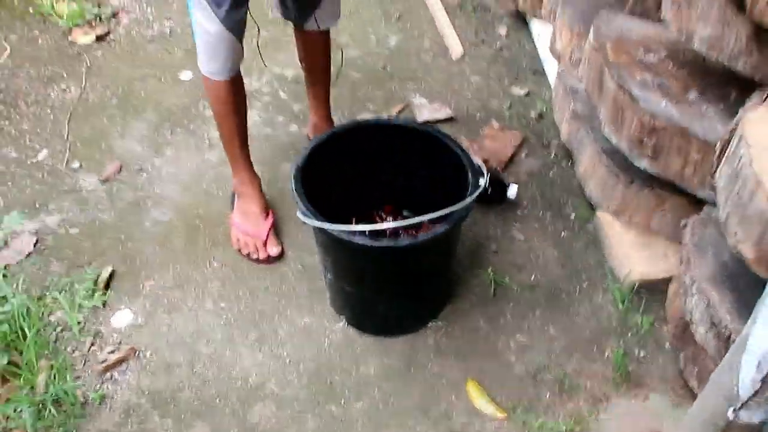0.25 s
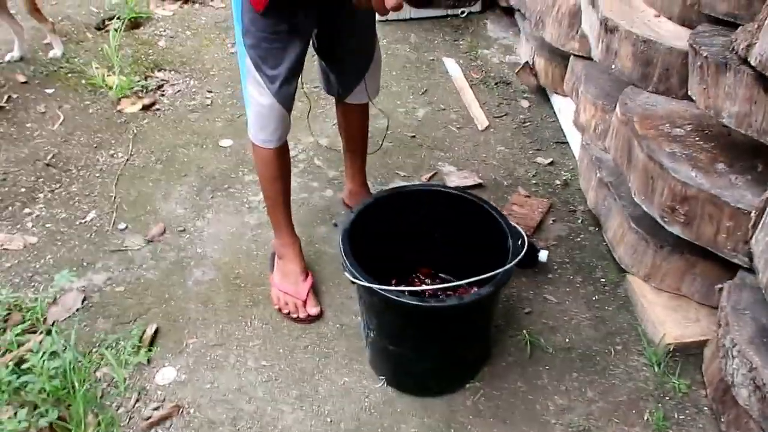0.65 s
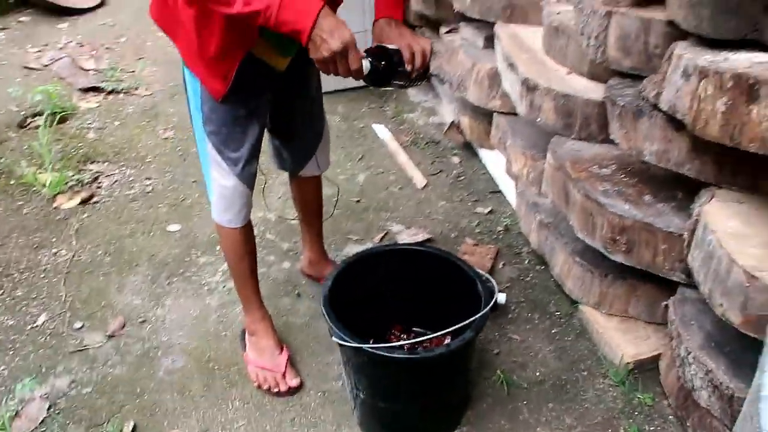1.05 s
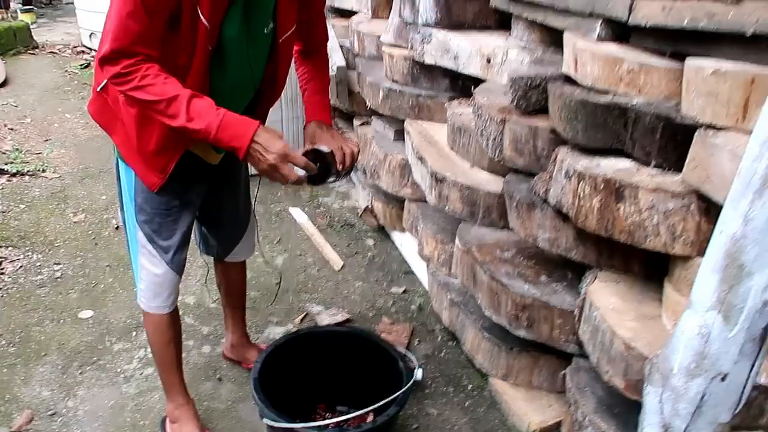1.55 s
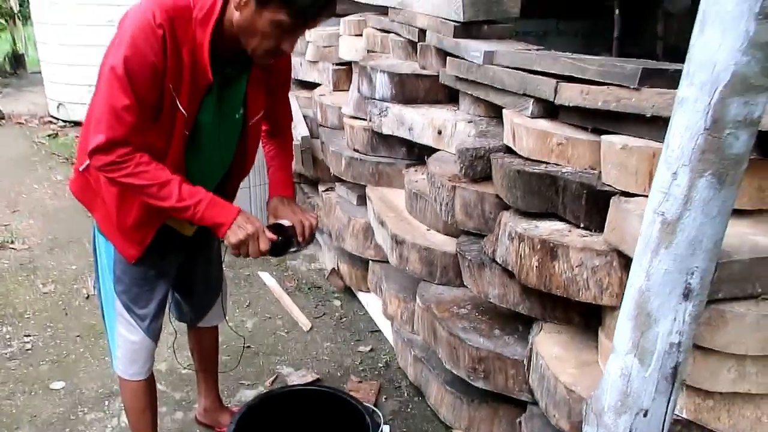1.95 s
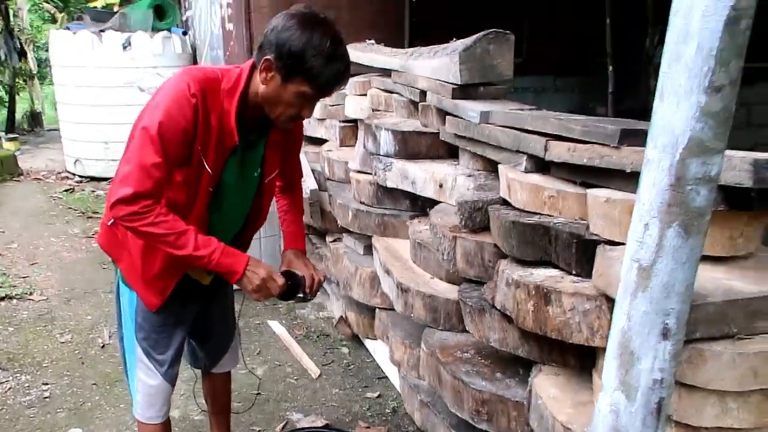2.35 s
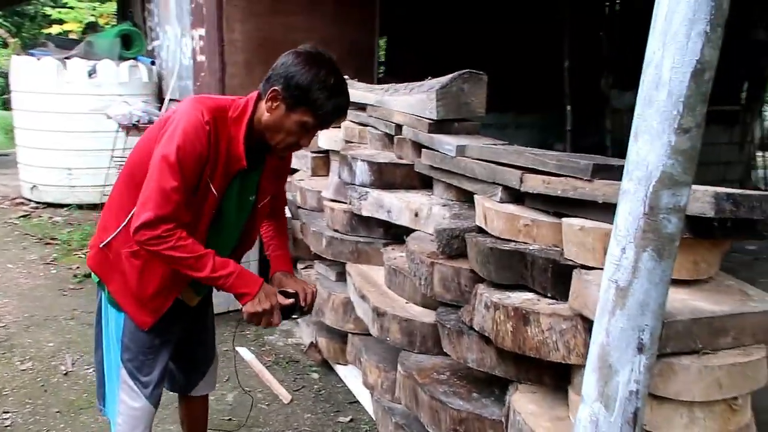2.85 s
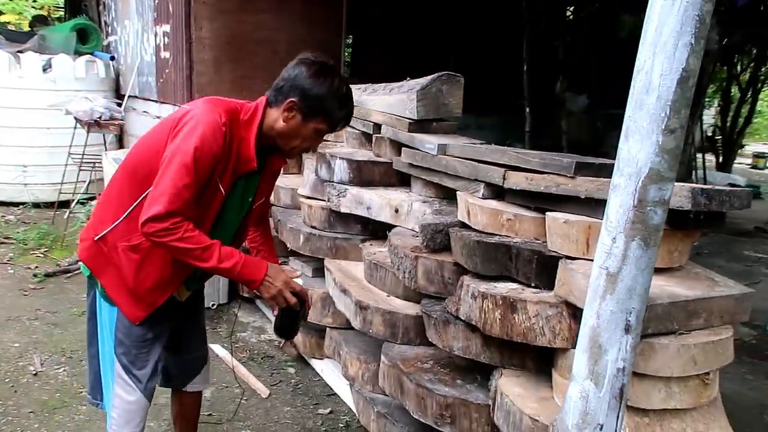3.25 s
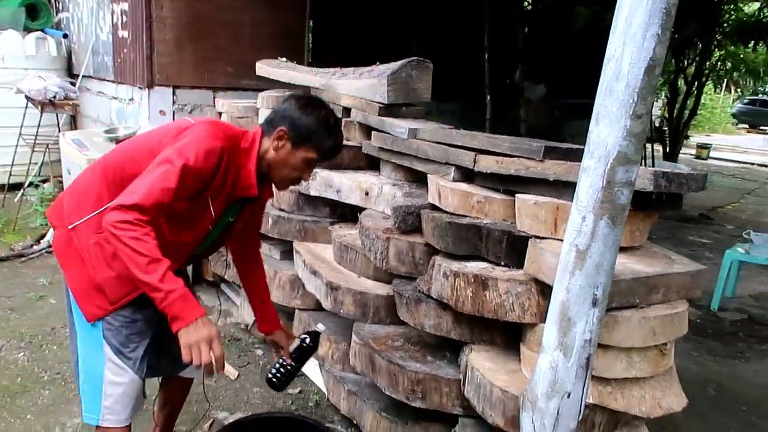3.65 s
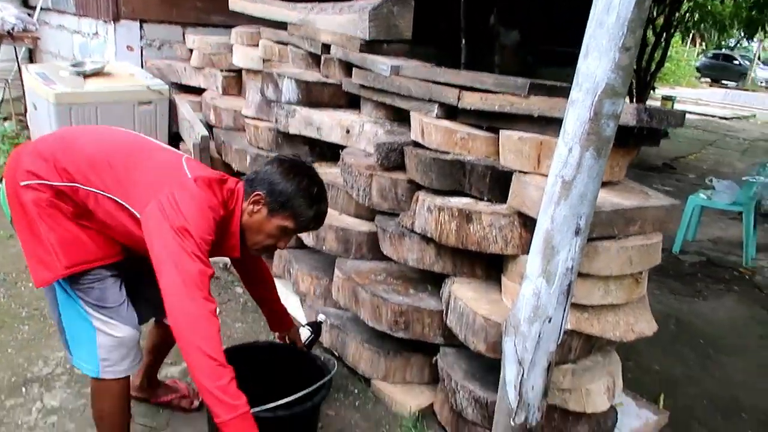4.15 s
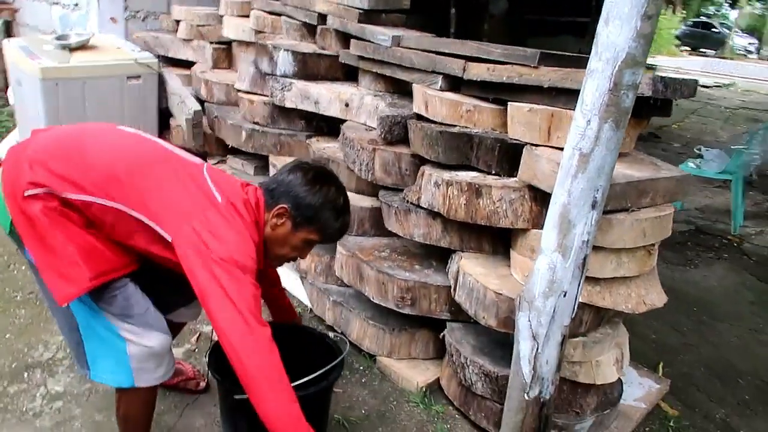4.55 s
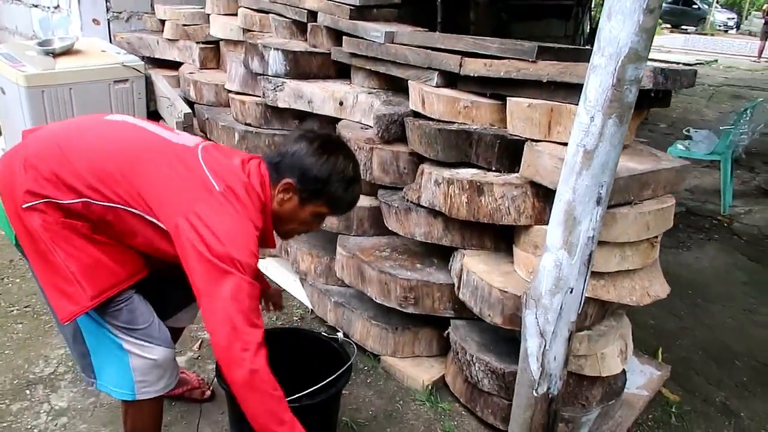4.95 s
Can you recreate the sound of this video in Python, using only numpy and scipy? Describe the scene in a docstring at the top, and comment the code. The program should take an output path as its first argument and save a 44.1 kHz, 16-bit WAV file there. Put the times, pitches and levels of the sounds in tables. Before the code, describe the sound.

A plastic bottle knocks and clicks over a bucket outdoors, its cap squeaking faintly as it is twisted, while a bird chirps briefly.

```python
"""Plastic bottle over a bucket

Close to the microphone, in a yard, a plastic bottle knocks and clicks over a plastic bucket. Hands rub
it, sleeves rustle, and the cap sticks and slips in squeaks as it is twisted off. A dull thump comes
before the last knocks, a faint one after. Farther off a bird chirps four times; a timber stack scatters
the sounds. The camera's noise suppressor holds the outdoor air down and lets it swell around each one."""
import sys
import numpy as np
from scipy import signal
from scipy.fft import rfft, irfft, next_fast_len
from scipy.io import wavfile
from scipy.ndimage import uniform_filter1d

SR = 44100
rng = np.random.default_rng(int(sys.argv[2]) if len(sys.argv) > 2 else 0)


def materialize(psi):
    """Save the field psi as 16-bit PCM at rate SR to the path in sys.argv[1].

    A 1-D psi becomes a single channel; in a 2-D psi each row is a channel.
    """
    bounded = np.clip(np.atleast_2d(psi).T, -1, 1)
    quanta = np.round(bounded * 32767).astype(np.int16)
    wavfile.write(sys.argv[1], SR, quanta)


N = 229011

# Strength of the breeze at the microphone. Each row: time in seconds, level in dB.
BREEZE_LEVELS = [(0, -50.5), (.35, -51.5), (.8, -55), (1.2, -56.5), (1.48, -53.5), (1.72, -55), (2.4, -52),
                 (3, -53.5), (4.698, -57), (5.19, -54)]
# Noise colours. Each row: frequency in Hz, relative spectral density in dB.
RUMBLE_SPECTRUM = [(15, -57), (25, -30.5), (65, -8), (85, -1), (193, -2.5), (254, -5), (379, -8),
                   (500, -14.5), (650, -39.5), (1100, -120)]
BREEZE_SPECTRUM = [(200, -31), (400, 1.5), (800, 0.5), (1500, -4), (2500, -11), (4000, -30)]
HISS_SPECTRUM = [(1180, -32.5), (2000, -2), (2830, 0), (4730, -3), (6700, -7.5), (8900, -7.5),
                 (9900, -14.5), (16000, -21.5)]
RASP_SPECTRUM = [(100, -13), (300, 4.5), (900, 1.5), (1600, 6), (2500, 7), (3500, 6.5), (4600, -4.5),
                 (7000, -10.5), (9000, -13), (11000, -22), (16000, -28)]
CLOTH_SPECTRUM = [(40, -13), (90, 4), (160, 8), (300, -2.5), (600, -7), (1200, -29), (3000, -56)]
FRICTION_SPECTRUM = [(80, -15.5), (250, -6.5), (700, -2.5), (1600, -4), (2800, -5), (4300, -3.5),
                     (6000, -10), (8500, -13.5), (11000, -19.5), (13000, -23.5), (16000, -27.5)]
# Near scatter and far echo. Each row: frequency in Hz, seconds to fall 60 dB (t60).
TIMBER_DECAY = [(200, 0.093), (1000, .11), (2500, 0.12), (4500, 0.049), (15000, 0.059)]
YARD_DECAY = [(200, 0.56), (1000, 0.28), (3000, 0.25), (12000, 0.14)]
# The bird's calls. Each row: start in seconds, length in seconds, level in dB, pitch ratio.
CHIRPS = [(2.473, 0.041, -36, 0.92), (2.742, 0.045, -31, 1.01), (2.931, .062, -28, .99),
          (3.138, 0.061, -27.5, 1)]
# The arch of one chirp. Each row: share of its length, base pitch in Hz, relative level in dB.
CHIRP_ARCH = [(0, 2040, -3), (.15, 2870, -10), (.28, 3330, -7.5), (.48, 3223, -10), (0.639, 2690, 0),
              (.82, 2530, -8), (1, 2510, -4.5)]
# The band the bird's throat passes. Each row: frequency in Hz, gain in dB.
THROAT_GAIN = [(800, -41), (1600, -1), (2100, 3), (3450, -2.5), (3800, -25.5), (5000, -35)]
# Swishes of the jacket. Each row: start in seconds, length in seconds, level in dB.
SWISHES = [(2.052, 0.23, -48), (2.286, 0.5, -52), (2.735, 0.33, -58), (3.161, 0.064, -51)]
# Hands and soles rubbing. Each row: start and length in seconds, level in dB, tilt in dB per octave.
RUBS = [(0.105, 0.038, -56, 4), (0.141, 0.023, -43.5, 0), (0.557, 0.05, -49.5, 0.5),
        (0.614, 0.18, -56, 2.5), (0.906, 0.024, -47, 5.5), (0.977, 0.058, -51.5, 4.5),
        (1.77, 0.053, -51, -2.5), (1.936, 0.097, -42.5, 8), (2.06, 0.077, -50.5, 3.5),
        (3.316, 0.17, -55, -1), (3.673, 0.031, -45.5, -4.5), (3.905, 0.12, -52.5, 1.5),
        (4.093, 0.066, -44.5, 7), (4.336, 0.063, -46, -0.5), (4.481, 0.031, -47.5, 3.5),
        (5.154, 0.049, -55.5, 0.5)]
# Soft thumps. Each row: start in seconds, level in dB, pitch in Hz.
THUMPS = [(3.694, -19.5, 205), (5.044, -40, 410)]
# What a thump rings with. Each row: ratio to its pitch, level in dB, t60 in seconds.
THUMP_MODES = [(1, -2, 0.045), (1.5, -5, 0.05), (2.4, -16.5, .03)]
# The cap's squeaks. Each row: start and length in seconds, pitch in Hz, level in dB, roughness.
SQUEAKS = [(0.9008, 0.017, 3340, -39.5, 0.97), (1.01, 0.019, 5480, -48, 0.54),
           (1.85, 0.052, 1524, -49, 0.68), (1.927, 0.039, 3940, -44, 0.46),
           (1.928, 0.036, 7850, -47.5, 0.5), (4.103, 0.0044, 3790, -38.5, 0.9),
           (4.33, 0.012, 1610, -47.5, 0.9), (4.355, 0.015, 4250, -43.5, 1.2),
           (4.416, 0.03, 2024, -42.5, 0.37), (4.471, 0.03, 2020, -49.5, 0.2)]
# Knocks and clicks of the plastic. Each row: time in seconds, strength in dB, bass weight in dB,
# hardness in dB per octave, clack pitch in Hz, wall buzz in dB.
CONTACTS = [(0.173, -21.5, -14, 14, 3460, -24), (0.174, 24.5, 4, -2, 3716, 2.5),
            (0.2144, 10.5, -27, 3.5, 4100, -13), (0.218, 5, 3.5, 1, 3100, -1),
            (0.233, -19, 22, 8, 3800, -13), (0.2908, -30, -9, 10.5, 9500, -20),
            (0.3618, 2, 4, -1.5, 3400, 10), (0.5673, -2, -7, -4, 3300, 1),
            (0.9091, -24.5, -6, 10.5, 3500, 1.5), (1.0143, -6.5, 4.5, -5, 4450, 7),
            (1.0244, -10.5, 1, 4, 3060, -6.5), (1.8121, -1, 13, -1.1, 2560, 16),
            (1.8271, 2, 5.5, -4.5, 4000, 8), (2.0513, 1.5, 9, .3, 2620, 8.5),
            (2.0923, 2.5, 4, -0.1, 4300, 2), (2.2244, 2.5, -3, -0.76, 3480, -3),
            (2.386, -5, 1, -3.5, 2840, 1), (2.906, 7, -6, -3.5, 2940, -7),
            (3.384, -48.5, -21, 12.5, 7800, -9), (3.5332, -13.5, 8.5, 2.5, 4200, 4),
            (3.841, 8.5, 4.5, -1, 4100, -3.5), (4.1049, -14.5, -2, 4.5, 4370, -4.5),
            (4.1694, 23, 0.5, -2.5, 2600, -9.5), (4.1719, 9.5, 5.5, -4.5, 2304, -8),
            (4.1874, 4.5, -4.5, 3, 2750, -5), (4.2415, -4, 6.5, -3.3, 2480, -4),
            (4.377, -2.5, -8, -3.2, 4100, -6), (4.3977, 1, -6, -8, 3500, -16)]
# The push that all contacts share. Each row: frequency in Hz, level in dB.
PUSH_SPECTRUM = [(40, -29), (130, -25.5), (220, -3.5), (420, 4), (1000, 0.24), (1750, -6), (3400, -8),
                 (5300, -13.5), (7000, -19.5), (9000, -21), (11000, -26), (16000, -32.5)]
# Ringing of the plastic shell. Each row: frequency in Hz, level in dB, t60 in seconds.
SHELL_MODES = [(387.5, 1.5, 0.012), (735, -2.5, 0.025), (843, -5, .07), (1305, 3, 0.032),
               (1451, -0.5, 0.088), (1680, -4, 0.057), (2150, 4, .022), (2360, -7.5, 0.1),
               (2770, -1, 0.026), (3550, -2, 0.059), (5330, -1.5, .035)]

WEIGHT_HZ, HARD_FROM_HZ, HARD_TO_HZ = 420, 1000, 13000  # full bass weight below; span of the tilt
CLACK_DB, CLACK_DB_PER_HARDNESS, CLACK_OCTAVES = 7, 0.45, 0.24  # a peak that grows with hardness
SECOND_VOICE_RATIO, SECOND_VOICE_DB = 0.92, -7  # the other side of the bird's syrinx sounds lower
BASS_CUT_DB, TREBLE_CUT_DB, SPLIT_HZ = 10.5, 14, 2800  # how far the suppressor lowers quiet air
KNEE_DB, CLOSE_PER_S, BLOCK = 5, 13.3, 1024  # rise that mostly opens it; closing speed; samples a block
CEILING, TOP_HZ = .93, 16100


def amp(db):
    return 10 ** (np.asarray(db) / 20)


def unit(x):
    return x / np.sqrt(np.mean(x ** 2) + 1e-20)


def along(points, hz):
    """Interpolate (Hz, value) points on a log frequency axis."""
    f, v = np.transpose(points)
    return np.interp(np.log(hz + 1), np.log(f + 1), v)


def clock(length):
    return np.arange(max(int(length * SR), 8)) / SR


def add(track, start, x):
    """Mix x into the track at start seconds."""
    i = int(np.clip(round(start * SR), 0, N - 1))
    track[i:i + len(x)] += x[:N - i]


def wobble(rate):
    """A smooth random curve, rate knots a second."""
    knots = rng.standard_normal(int(N * rate / SR) + 4)
    fine = signal.resample_poly(knots, up=8, down=1)
    return np.interp(np.arange(N) * rate / SR, np.arange(len(fine)) / 8, fine)


def filtered(x, gain):
    """x times a gain that depends on frequency."""
    m = next_fast_len(len(x) + 8192)
    return irfft(rfft(x, m) * gain(np.fft.rfftfreq(m, 1 / SR)), m)[:len(x)]


def band(x, low_hz, high_hz):
    """A causal band-pass."""
    sos = signal.butter(3, [low_hz, min(high_hz, .49 * SR)], "band", fs=SR, output="sos")
    return signal.sosfilt(sos, x)


def noise(spectrum):
    return unit(filtered(rng.standard_normal(N), lambda hz: amp(along(spectrum, hz))))


def push(spectrum, size):
    """The shortest causal pulse with this spectrum."""
    cepstrum = irfft(np.log(amp(along(spectrum, np.fft.rfftfreq(size, 1 / SR)))))
    cepstrum[1:size // 2] *= 2
    cepstrum[size // 2 + 1:] = 0
    return irfft(np.exp(rfft(cepstrum)))


def tail(decays, onset_s, size=12288):
    """A diffuse echo of energy 1; each frequency dies at its own speed."""
    hz, t, spectra = signal.stft(rng.standard_normal(size), SR, nperseg=256)
    decay = amp(-60 * t / along(decays, hz)[:, None])
    echo = signal.istft(spectra * decay, SR, nperseg=256)[1][:size]
    echo *= 1 - np.exp(-(np.arange(size) / SR / onset_s) ** 2)
    return echo / np.linalg.norm(echo)


def space(near_db, far_db):
    """Three paths to the microphone: direct, off the nearby timber, and round the yard."""
    paths = amp(near_db) * tail(TIMBER_DECAY, onset_s=0.0032)
    paths += amp(far_db) * tail(YARD_DECAY, onset_s=0.021)
    paths[0] += 1
    return paths


def air():
    """The bed of the yard: one breeze drives a low rumble and soft moving air, under a steady hiss."""
    breeze_db = np.interp(np.arange(N) / SR, *np.transpose(BREEZE_LEVELS))
    rumble = amp(breeze_db - 2.5 + 1.5 * wobble(10)) * noise(RUMBLE_SPECTRUM)
    breeze = amp(breeze_db + 0.58 * wobble(30)) * noise(BREEZE_SPECTRUM)
    return rumble + breeze + amp(-58.5) * noise(HISS_SPECTRUM)


def bird():
    """Farther off, a harsh two-voiced arch of pitch with a rasp, heard mostly through reflections."""
    voice, rasp_level = np.zeros(N), np.zeros(N)
    flutter, rough = wobble(900), wobble(1700)
    share, arch_hz, arch_db = np.transpose(CHIRP_ARCH)
    for start, length, db, ratio in CHIRPS:
        progress = clock(length) / length
        part = slice(int(start * SR), int(start * SR) + len(progress))
        hz = ratio * np.interp(progress, share, arch_hz) * (1 + .04 * flutter[part])
        phase = 2 * np.pi * np.cumsum(hz) / SR
        syrinx = np.sin(phase) + amp(SECOND_VOICE_DB) * np.sin(SECOND_VOICE_RATIO * phase)
        effort = amp(db + np.interp(progress, share, arch_db)) * signal.windows.tukey(len(progress), .12)
        add(voice, start, effort * syrinx * (1 + .5 * rough[part]))
        add(rasp_level, start, np.sqrt(effort))  # the rasp grows more slowly than the tone
    throat = filtered(voice, lambda hz: amp(along(THROAT_GAIN, hz)))
    call = throat + amp(-30.5) * rasp_level * noise(RASP_SPECTRUM)
    eaves = amp(1.0) * tail([(2000, 0.097), (4000, 0.25)], onset_s=0.0098)
    return amp(-2) * signal.oaconvolve(call, space(near_db=-9.5, far_db=-14.5) + eaves)[:N]


def sleeves():
    """Close and dry, the jacket rustles dully with each twist of the cap."""
    motion = np.zeros(N)
    for start, length, db in SWISHES:
        add(motion, start, amp(db) * signal.windows.tukey(len(clock(length)), .5))
    return motion * amp(2.0 * wobble(30.1)) * noise(CLOTH_SPECTRUM)


def rubs(size=8192):
    """Friction is a swarm of tiny slips in clumps, swelling and fading with the stroke."""
    out, hz = np.zeros(N), np.fft.rfftfreq(size, 1 / SR)
    octaves = np.log2(np.clip(hz, 300, 6500) / 1000)
    for start, length, db, tilt in RUBS:
        slips = rng.standard_normal(size) * amp(7.5 * rng.standard_normal(size))
        colour = amp(along(FRICTION_SPECTRUM, hz) + tilt * octaves)
        stroke = unit(irfft(rfft(slips) * colour))[:len(clock(length))]
        add(out, start, amp(db) * stroke * signal.windows.tukey(len(stroke), .5))
    clumps = amp(2.2 * wobble(260))
    return signal.oaconvolve(out * clumps, space(near_db=-10.5, far_db=-9.5))[:N]


def thumps():
    """A soft, heavy contact gives a dull slap and rings only a few low, damped modes."""
    out, t = np.zeros(N), clock(0.25)
    for start, db, hz in THUMPS:
        ring = sum(amp(level - 60 * t / t60) * np.sin(2 * np.pi * ratio * hz * t)
                   for ratio, level, t60 in THUMP_MODES)
        slap = unit(band(rng.standard_normal(len(t)), 200, 670)) * amp(-14 - 60 * t / 0.059)
        add(out, start, amp(db) * band(ring + slap, 174, 3000))
    return signal.fftconvolve(out, space(near_db=-13, far_db=-31.5))[:N]


def cap_squeaks():
    """The cap sticks and slips fast and almost regularly: a tone that wavers in pitch and strength."""
    out, waver, grip = np.zeros(N), wobble(1400), wobble(400)
    for start, length, hz, db, rough in SQUEAKS:
        count = len(clock(length))
        part = slice(int(start * SR), int(start * SR) + count)
        phase = 2 * np.pi * np.cumsum(hz * (1 + rough * waver[part] / 20)) / SR
        tone = (np.sin(phase) + amp(-19) * np.sin(2 * phase)) * amp(4 * rough * grip[part])
        add(out, start, amp(db) * unit(tone) * signal.windows.tukey(count, .5))
    return signal.oaconvolve(out, space(near_db=-16, far_db=-21.5))[:N]


def bottle_knocks(size=4096):
    """Up close, each contact is a short push; the thin wall buzzes briefly and the shell rings on."""
    out, t, hz = np.zeros(N), np.arange(size) / SR, np.fft.rfftfreq(2 * size, 1 / SR)
    mode_hz, mode_db, t60 = np.transpose(SHELL_MODES)[:, :, None]
    modes = amp(mode_db - 60 * t / t60) * np.cos(2 * np.pi * mode_hz * t)
    bending = np.exp(-2j * np.pi * np.sqrt(hz / 1500))  # bending waves carry treble ahead of bass
    blow = band(signal.unit_impulse(size), 130, 4600)
    bass = along([(WEIGHT_HZ, 1), (HARD_FROM_HZ, 0)], hz)
    octaves = np.log2(np.clip(hz, HARD_FROM_HZ, HARD_TO_HZ) / HARD_FROM_HZ)
    for start, db, weight_db, hardness, clack_hz, buzz_db in CONTACTS:
        clack_shape = np.exp(-.5 * (np.log2((hz + 1) / clack_hz) / CLACK_OCTAVES) ** 2)
        clack_db = (CLACK_DB + CLACK_DB_PER_HARDNESS * hardness) * clack_shape
        push_db = db + along(PUSH_SPECTRUM, hz) + weight_db * bass + hardness * octaves + clack_db
        pulse = push(np.column_stack([hz, push_db]), size)
        ring = (amp(rng.normal(0, 1.5, mode_hz.shape)) * modes).sum(0)
        crack = band(rng.standard_normal(size), 5200, 18000) * amp(-60 * t / .004)
        buzz = band(rng.standard_normal(size), 960, 18000) * amp(-60 * t / 0.032)
        buzz *= 1 - np.exp(-t / 0.0002)
        scatter = tail(TIMBER_DECAY, onset_s=0.0012, size=size)
        response = (blow + amp(-2) * crack / np.linalg.norm(crack)
                    + amp(buzz_db) * buzz / np.linalg.norm(buzz) + amp(-49) * ring + amp(-10) * scatter)
        hit = irfft(rfft(pulse, 2 * size) * rfft(response, 2 * size) * bending)
        add(out, start - .0002, amp(-1) * hit / np.linalg.norm(response))
    return out + amp(-24) * signal.oaconvolve(out, tail(YARD_DECAY, onset_s=0.0025))[:N]


def suppressor(x):
    """Block by block, it opens at once when sound rises over the background, then closes gradually."""
    power = np.abs(uniform_filter1d(band(x, 330, 12000) ** 2, size=384))
    peak_db = 10 * np.log10(np.maximum.reduceat(power, np.arange(0, N, BLOCK)) + 1e-20)
    rise_db = np.maximum(peak_db - np.percentile(peak_db, 20), 0)
    closing = CLOSE_PER_S * np.arange(len(rise_db)) * BLOCK / SR
    shut = np.minimum.accumulate(np.exp(-rise_db / KNEE_DB) - closing) + closing  # 0 open, 1 closed
    shut = uniform_filter1d(np.repeat(shut, BLOCK)[:N], size=256)
    bass = filtered(x, lambda hz: 1 / (1 + (hz / SPLIT_HZ) ** 2))
    return bass * amp(-BASS_CUT_DB * shut) + (x - bass) * amp(-TREBLE_CUT_DB * shut)


def scene():
    """The yard as it reaches one microphone."""
    return (bottle_knocks() + thumps() + rubs() + cap_squeaks() + bird() + sleeves() + air())[None]


def record(dry):
    """The camera suppresses background noise, rounds off the highest peaks and cuts the top treble."""
    gated = suppressor(dry[0])
    rounded = gated / (1 + (gated / CEILING) ** 8) ** (1 / 8)
    return filtered(rounded, lambda hz: 1 / (1 + (hz / TOP_HZ) ** 120))[None]


dry = scene()
out = record(dry)
materialize(out)
```